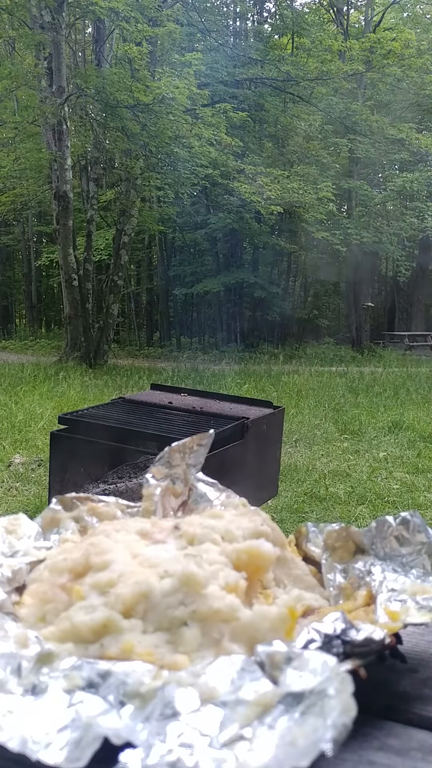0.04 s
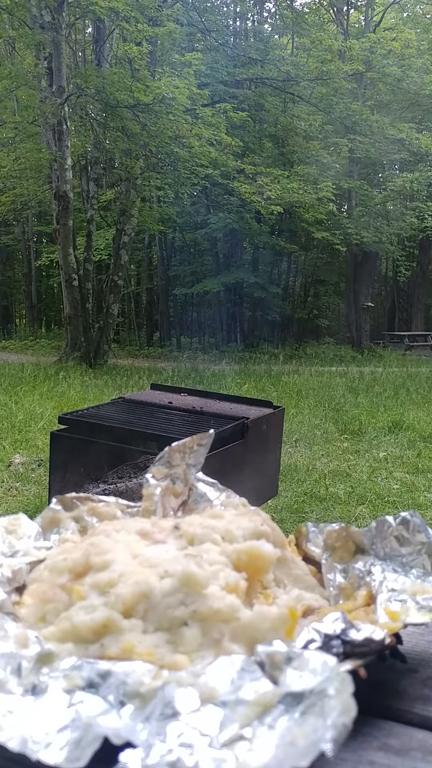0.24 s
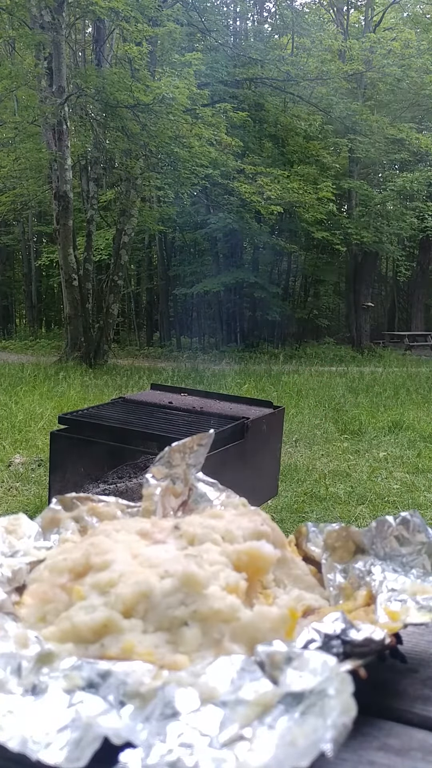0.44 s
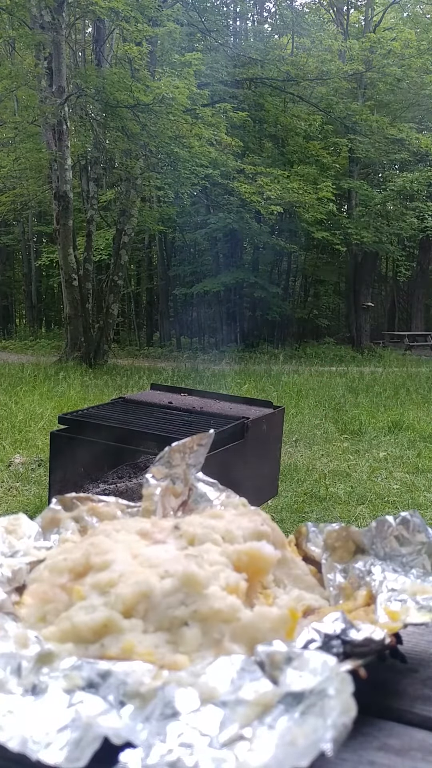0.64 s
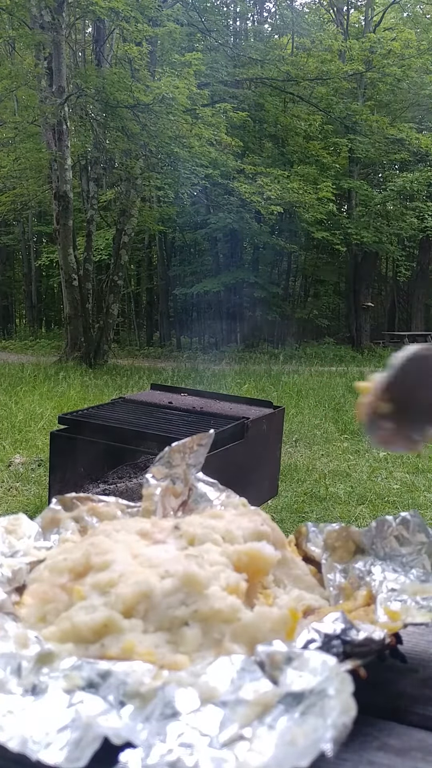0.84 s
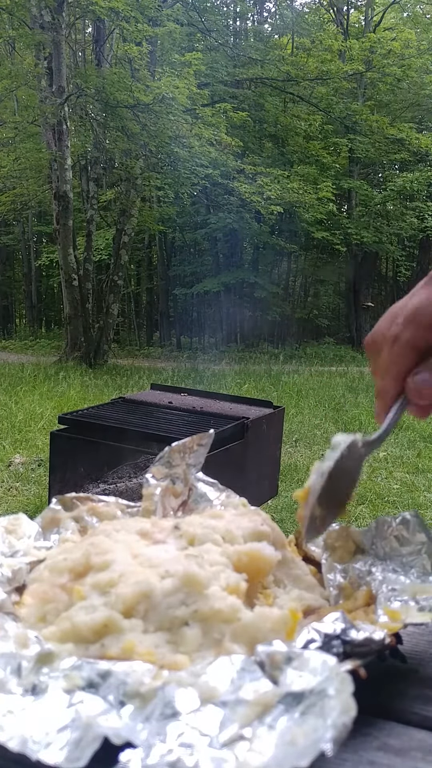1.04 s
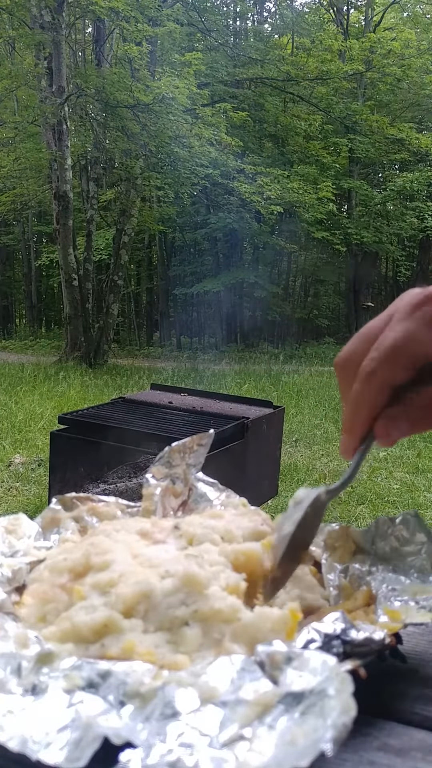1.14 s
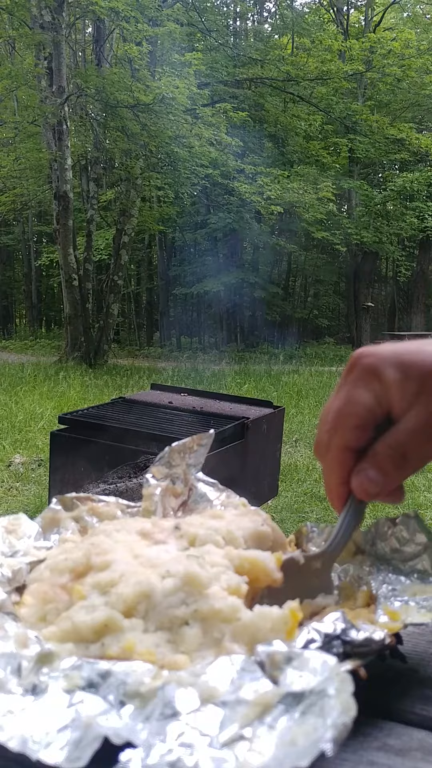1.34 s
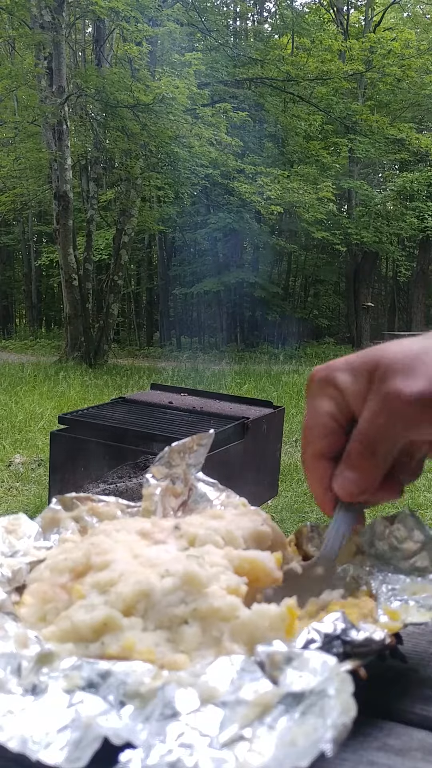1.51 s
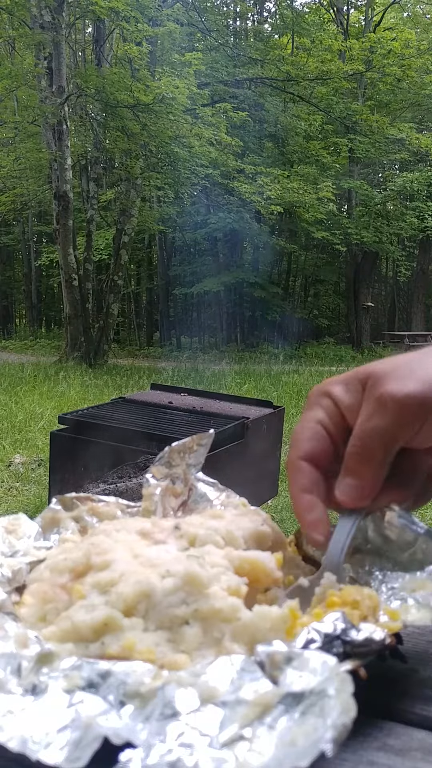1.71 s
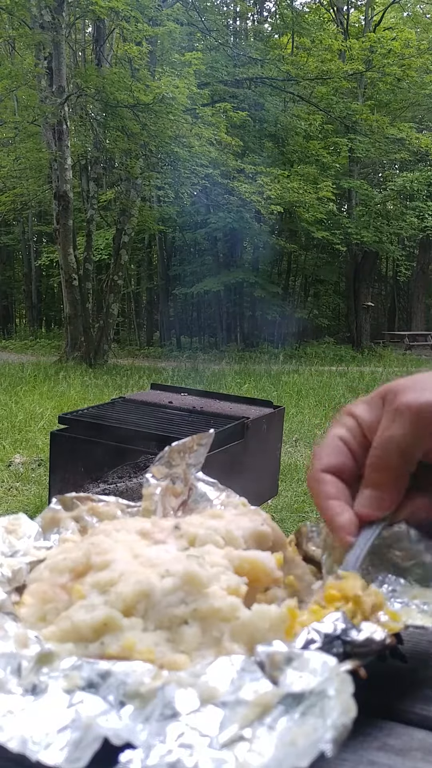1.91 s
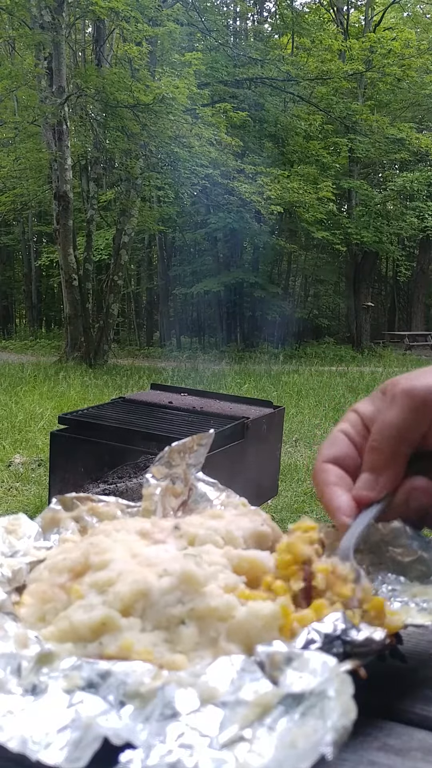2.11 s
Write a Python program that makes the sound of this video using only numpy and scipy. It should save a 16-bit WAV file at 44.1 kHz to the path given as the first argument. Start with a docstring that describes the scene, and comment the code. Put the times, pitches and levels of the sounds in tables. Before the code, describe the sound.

Something hard is set down on a wooden table in a quiet forest clearing, briefly buzzing the microphone resting there. A second, hollow knock follows, then quiet scrapes and crinkles as a spoon digs into a foil packet.

```python
"""Picnic table in a forest clearing

Something hard is put down on a wooden table: the boards ring, the case of the microphone resting on
them buzzes, and the trees answer. A soft bump follows, then a short slide ending in a hollow knock.
A metal spoon digs into food in a foil packet, catching and slipping in short scrapes as creases snap.
Behind it all lie very quiet open air and, at the start, one faint bird-like note."""
import sys
import numpy as np
from scipy import signal
from scipy.fft import rfft, irfft, next_fast_len
from scipy.io import wavfile
from scipy.ndimage import map_coordinates

SR = 44100
rng = np.random.default_rng(int(sys.argv[2]) if len(sys.argv) > 2 else 0)


def materialize(psi):
    """Save the field psi as 16-bit PCM at rate SR to the path in sys.argv[1].

    A 1-D psi becomes a single channel; in a 2-D psi each row is a channel.
    """
    bounded = np.clip(np.atleast_2d(psi).T, -1, 1)
    quanta = np.round(bounded * 32767).astype(np.int16)
    wavfile.write(sys.argv[1], SR, quanta)


N = 94815
T = np.arange(N) / SR
KNOCK_S = 0.243
WOOD_WIDTH, PACKET_WIDTH, AIR_WIDTH = 0.1, 0.688, 0.74  # stereo spread of the noise

# Tone curves give shape only; a positive pan_db leans left.
# hollow ring of the table under bumps and slides: pitch_hz, level_db, t60_s, pan_db
HOLLOW_MODES = [(416, -28.5, 0.061, -9), (616, -33.5, 0.072, -10.5), (780, -32.5, 0.081, -15),
                (933, -30, 0.054, -14), (1044, -39.5, 0.054, -19.5), (1533, -33.5, 0.05, 2),
                (1603, -33.5, 0.068, -5), (2150, -55, .04, -3), (2790, -57.5, 0.066, 19),
                (3200, -54.5, .06, 2)]
# dull tone of the wood under that ring: freq_hz, level_db
THUMP_TONE = [(30, -27), (90, -15.5), (170, 2.5), (300, -7.5), (900, -8.5), (1300, -17.5), (2200, -22.5),
              (3400, -31), (5500, -35.5), (9000, -52), (16000, -64)]


def knock():
    """A hard blow rings the boards, with a crack of dense, short resonances and a low thud."""
    # modes of the boards: pitch_hz, level_db, t60_s, pan_db
    board_modes = [(319.3, -24, 0.13, 6.5), (382, -18.5, 0.026, 7), (498, -17.5, 0.063, 5.5),
                   (590, -32, 0.22, -4), (692.2, -17.5, 0.123, 0), (803, -17, 0.1, -3.5),
                   (918, -10.5, 0.09, -7.5), (995, -26.5, 0.092, -13), (1123, -16.5, 0.061, -13.5),
                   (1226.3, -21.5, 0.073, -3), (1309, -17, 0.074, -1), (1544.6, -2, 0.038, 3),
                   (1622, -13.5, 0.049, -1.5), (1759, -16.5, 0.028, -4), (2044, -17.5, 0.038, 10.5),
                   (2217, -19, 0.038, 21), (2786, -29.5, 0.053, 11.5), (3100, -25, 0.081, 18),
                   (3280, -26.5, 0.031, -0.5), (3640, -24.5, 0.016, 11.5)]
    # tone of the crack and of the thud: freq_hz, level_db
    crack_tone = [(30, -9), (120, -2.5), (450, -6), (1000, -5.5), (1550, 3.5), (2250, -7), (2520, -19),
                  (2950, -11.5), (3700, -13), (4100, -21), (4500, -16), (6600, -28.5), (7400, -49),
                  (16000, -66.5)]
    thud_tone = [(25, -8), (70, -9.5), (160, -1.5), (320, -3), (600, -17.5), (3000, -60.5)]
    # stereo placement of the crack: freq_hz, pan_db
    crack_pan = [(60, 7), (300, 8), (800, -5), (1500, -3), (2400, 10), (3300, 8.5), (4500, 18.5),
                 (9000, 22)]
    push = undb(4.5) * impulse(KNOCK_S)
    burst = undb(-22) * noise(width=0.46) * fade(KNOCK_S, t60_s=0.051)
    crack = colour(push + burst, crack_tone, crack_pan)
    thud = colour(noise(AIR_WIDTH) * fade(KNOCK_S, t60_s=0.47), thud_tone)
    return undb(-0.5) * ring(KNOCK_S, board_modes) + crack + undb(-40) * thud


def case_rattle():
    """The microphone's case buzzes on the jolted boards: thin, bright ticks on the left."""
    # jolts of the case: start_s, buzz_db, tick_db
    jolts = [(0.1624, -52.5, -83), (.179, -55.5, -81), (0.2424, -11, -76), (.2868, -26.5, -34),
             (0.614, -56, -61), (0.9029, -54, -75), (1.299, -56, -80), (1.312, -46, -80)]
    # tone of the buzz and of the tick: freq_hz, level_db
    buzz_tone = [(3000, -45), (7400, -37), (7950, -5.5), (8550, -2), (9000, -16), (9500, -8),
                 (10400, -39.5), (12000, -54), (12700, -34.5), (14500, -49), (16000, -57.5)]
    tick_tone = [(2000, -26), (5000, -10.5), (6500, -3), (9000, 3), (11000, -8.5), (16000, -11)]
    t60_s, tail_t60_s, tail_db, right_db = 0.012, 0.14, -28.5, -23.5
    shake = sum(undb(db) * (fade(s, t60_s) + undb(tail_db) * fade(s, tail_t60_s)) for s, db, _ in jolts)
    taps = sum(undb(db) * fade(s, t60_s) for s, _, db in jolts)
    buzz = colour(noise(WOOD_WIDTH) * shake, buzz_tone)
    ticks = colour(noise(WOOD_WIDTH) * taps, tick_tone)
    return (buzz + ticks) * undb([[0], [right_db]])


def bumps():
    """Softer blows to the right: a click and a hollow ring over a dull thump."""
    # blows on the table: start_s, ring_db, thump_db
    blows = [(0.6155, -27.5, -49), (0.9022, -1.5, -39), (1.243, -36.5, -64.5), (1.3237, -29, -50.5),
             (1.382, -41, -61.5)]
    hollow = sum(undb(db) * ring(s, HOLLOW_MODES) for s, db, _ in blows)
    clicks = undb(14) * sum(undb(db) * impulse(s) for s, _, db in blows)
    decay = sum(undb(db) * fade(s, t60_s=0.14) for s, _, db in blows)
    thump = colour(clicks + noise(WOOD_WIDTH) * decay, THUMP_TONE)
    return hollow + sides(pan_db=-6.5) * thump


def slide():
    """Friction on the boards excites their hollow ring and a dull rub."""
    # pushes across the wood: peak_s, rise_s, fall_s, level_db
    pushes = [(0.759, 0.043, 0.025, -67.5), (0.861, 0.014, 0.016, -52), (0.895, 0.016, .008, -49)]
    rub = noise(WOOD_WIDTH) * sum(undb(db) * swell(s, rise, fall) for s, rise, fall, db in pushes)
    response = ring(0, HOLLOW_MODES)
    response /= np.sqrt(np.sum(response ** 2) / 2)  # unit energy, averaged over both sides
    hollow = signal.fftconvolve(rub, response, axes=1)[:, :N]
    return hollow + undb(-1.5) * colour(rub, THUMP_TONE)


def spoon():
    """The spoon catches and slips on foil: showers of tiny clicks, with creases snapping."""
    # spoon strokes: peak_s, rise_s, fall_s, body_db, scrape_db, crinkle_db
    strokes = [(1.319, 0.015, 0.017, -79.5, -61, -59), (1.475, 0.01, 0.0077, -61, -48, -65),
               (1.513, 0.055, 0.035, -55, -62, -73), (1.682, 0.014, 0.013, -46, -48.5, -45.5),
               (1.798, 0.0088, 0.034, -52.5, -53, -48.5), (1.875, 0.0085, 0.012, -63.5, -81, -56.5),
               (1.933, .016, 0.019, -84, -70.5, -59)]
    # single creases giving way: start_s, body_db, scrape_db, crinkle_db
    snaps = [(1.3235, -47, -49, -60), (1.4432, -57, -49, -65), (1.456, -52, -49, -51),
             (1.4693, -46, -42.5, -53.5), (1.478, -51, -45, -59), (1.494, -45, -47.5, -54.5),
             (1.555, -65, -60, -57), (1.566, -67, -59, -61), (1.649, -49, -65, -66),
             (1.6828, -38.5, -49, -40), (1.685, -43, -49, -33), (1.786, -65, -65, -52),
             (1.798, -52, -48, -38), (1.816, -51, -50, -51), (1.835, -51, -56, -64), (1.935, -76, -70, -54),
             (2.135, -72, -63, -68)]
    # the packet's three voices, low to high: freq_hz, level_db
    body = [(60, -14.5), (300, -11.5), (480, -13), (700, -4), (860, -3), (1050, -14), (1350, -9),
            (1700, -12), (3000, -36), (16000, -62)]
    scrape = [(200, -32), (1100, 0.5), (1800, 0), (2250, -1.5), (2900, -1.5), (3600, 1.5), (5000, -12.5),
              (8000, -19.5), (16000, -64)]
    crinkle = [(500, -14.5), (3000, -14.5), (3900, -3), (4700, 7.5), (6000, 1.5), (7100, -8.5), (8000, 0.5),
               (8750, -0.5), (9400, -9.5), (10500, -20), (12000, -18.5), (15000, -21), (16000, -44)]
    # stereo placement of the packet: freq_hz, pan_db
    packet_pan = [(100, 6.5), (750, -5.5), (1300, -1), (2500, 4), (5500, 2), (8500, 16.5), (14000, 14)]
    grains_per_s = 2600
    grains = (rng.random(N) < grains_per_s / SR) * rng.choice([-1, 1], N)
    accent_db = np.minimum(rng.exponential(size=N), 3.5)
    grains = grains * undb(accent_db) * stick_slip(depth_db=3.5)
    grains = grains / grains.std() * (1 + PACKET_WIDTH * rng.standard_normal((2, N)))
    packet = 0
    for k, voice in enumerate((body, scrape, crinkle)):
        pressure = sum(undb(db[k]) * swell(s, rise, fall) for s, rise, fall, *db in strokes)
        # a crease breaks with a click, then rustles briefly
        clicks = undb(15.5) * sum(undb(db[k]) * impulse(s) for s, *db in snaps)
        settling = sum(undb(db[k]) * fade(s, t60_s=0.021) for s, *db in snaps)
        rustle = undb(-2) * noise(PACKET_WIDTH) * settling
        packet += colour(grains * pressure + clicks + rustle, voice, packet_pan)
    return packet


def foil_rasp():
    """Friction through one broad foil resonance that sinks in pitch as the spoon digs in."""
    # path of the resonance: time_s, centre_hz, level_db
    glide = [(1.441, 3200, -76), (1.468, 2600, -48), (1.478, 2093, -46), (1.486, 1793, -64),
             (1.495, 1529, -46.5), (1.51, 1286, -61.5), (1.561, 990, -75)]
    time_s, centre_hz, level_db = np.array(glide).T
    bandwidth_hz = 1300
    band = lowpass(noise(PACKET_WIDTH) + 1j * noise(PACKET_WIDTH), bandwidth_hz / 2)
    phase = 2 * np.pi * np.cumsum(np.interp(T, time_s, centre_hz)) / SR
    rasp = stick_slip(depth_db=3) * np.real(band * np.exp(1j * phase))  # band shifted up to the centre
    envelope = undb(np.interp(T, time_s, level_db, left=-120, right=-120))
    return sides(pan_db=4.5) * rasp / rasp.std() * envelope


def stick_slip(depth_db, catches_per_s=270):
    """The uneven grip of the spoon, as a jittering gain."""
    return undb(depth_db * np.interp(T * catches_per_s, np.arange(N), rng.uniform(-2, 2, N)))


def table_rumble():
    """The table rumbles softly as weight shifts on it."""
    # shifts of weight: peak_s, rise_s, fall_s, level_db
    shifts = [(0.351, 0.014, 0.018, -49.5), (0.629, 0.0045, 0.0083, -45), (.755, 0.046, 0.031, -58.5),
              (.91, 0.023, 0.03, -50.5), (1.251, 0.016, 0.017, -61), (1.34, 0.011, 0.063, -52),
              (1.51, 0.064, 0.071, -61.5)]
    # tone of the rumble: freq_hz, level_db
    rumble_tone = [(25, -9.5), (60, -4.5), (120, 0.5), (170, -1), (230, -12.5), (400, -15.5), (900, -41),
                   (3000, -68.5)]
    load = sum(undb(db) * swell(s, rise, fall) for s, rise, fall, db in shifts)
    return sides(pan_db=-7) * colour(noise(AIR_WIDTH) * load, rumble_tone)


def forest_echo():
    """Trunks and leaves scatter the hard knock, treble dying first; the forest edge answers late."""
    # tone of the echo from the trees and from the forest edge: freq_hz, level_db
    trees_tone = [(100, -13), (450, -16), (700, -4), (1000, -3), (1250, -2.5), (1550, -0.5), (2200, -6.5),
                  (2550, -20.5), (3000, -11), (4000, -26), (7000, -41.5), (16000, -59)]
    edge_tone = [(300, -30), (700, -14), (950, -7), (1050, -11), (1300, -2.5), (1580, 1), (1750, -7.5),
                 (2100, -8), (2500, -21.5), (3100, -21), (5000, -45)]
    build_s, edge_delay_s = 0.025, 0.18
    scatter = colour(noise(width=1), trees_tone)
    lows = lowpass(scatter, cutoff_hz=1800)
    tail = lows * fade(KNOCK_S, t60_s=0.42, attack_s=build_s)
    tail += (scatter - lows) * fade(KNOCK_S, t60_s=0.34, attack_s=build_s)
    late_swell = swell(KNOCK_S + edge_delay_s, rise_s=0.07, fall_s=0.052) * (T > KNOCK_S)
    edge = colour(noise(width=1), edge_tone) * late_swell
    return sides(pan_db=-5) * (undb(-30.5) * tail + undb(-53) * edge)


def far_whistle():
    """A very faint wavering note, like a bird deep in the woods."""
    pitch_hz, end_s, release_s = 1850, 0.19, 0.03
    waver = 0.008 * np.interp(T * 30, np.arange(N), rng.standard_normal(N))
    note = np.sqrt(2) * np.sin(2 * np.pi * np.cumsum(pitch_hz * (1 + waver)) / SR)
    return undb(-83.5) * note * np.clip((end_s - T) / release_s, 0, 1)


def open_air():
    """A quiet bed of outdoor rumble and hiss."""
    # tone of the clearing: freq_hz, level_db
    air_tone = [(25, -11), (50, -0.5), (130, -4.5), (200, -12), (400, -14), (600, -18.5), (1200, -21.5),
                (2400, -26), (5000, -28), (9000, -27), (11000, -31.5), (15500, -35)]
    return undb(-66.5) * colour(noise(AIR_WIDTH), air_tone)


def ring(start_s, modes, contact_s=0.0004):
    """Decaying modes of struck wood, neighbours swinging in opposite directions."""
    return sum((-1) ** k * undb(db) * sides(pan_db) * fade(start_s, t60_s, contact_s)
               * np.sin(2 * np.pi * hz * (T - start_s))
               for k, (hz, db, t60_s, pan_db) in enumerate(modes))


def impulse(start_s):
    """One sharp push."""
    return 1. * (np.arange(N) == int(start_s * SR))


def fade(start_s, t60_s, attack_s=0.0002):
    """Quick rise and exponential decay."""
    age = np.maximum(T - start_s, 0)
    return (1 - np.exp(-age / attack_s)) * np.exp(-np.log(1000) * age / t60_s)


def swell(peak_s, rise_s, fall_s):
    """An envelope that builds to a peak and lets go."""
    return np.exp(-np.maximum((peak_s - T) / rise_s, (T - peak_s) / fall_s))


def noise(width):
    """Stereo white noise; width 0 is the same in both ears, 1 unrelated."""
    mid, side = rng.standard_normal((2, N))
    return (mid + width * side * np.array([[1], [-1]])) / np.hypot(1, width)


def colour(x, tone, pan=((100, 0), (1000, 0))):
    """Unit-power EQ along a tone curve, panned by frequency."""
    size = next_fast_len(2 * N)
    size += size % 2
    log_hz = np.log(np.maximum(np.fft.rfftfreq(size, 1 / SR), 1))
    curve = lambda points: np.interp(log_hz, np.log([hz for hz, _ in points]), [db for _, db in points])
    gain = undb(curve(tone) + np.array([[1], [-1]]) * curve(pan) / 2)
    gain /= np.sqrt(np.mean(gain ** 2))
    # minimum phase, so nothing rings ahead of a hit
    cepstrum = irfft(np.log(gain))
    cepstrum[:, 1:size // 2] *= 2
    cepstrum[:, size // 2 + 1:] = 0
    return irfft(rfft(x, size) * np.exp(rfft(cepstrum)))[:, :N]


def lowpass(x, cutoff_hz):
    """Gentle two-pole treble roll-off."""
    return signal.sosfilt(signal.butter(2, cutoff_hz, fs=SR, output="sos"), x)


def sides(pan_db):
    """Left and right gains for a level difference."""
    return undb(np.array([[pan_db], [-pan_db]]) / 2)


def undb(db):
    """Decibels to gain."""
    return 10 ** (np.asarray(db) / 20)


def scene():
    """The table and its echo, the spoon in the packet, and the clearing behind."""
    table = knock() + forest_echo() + case_rattle() + bumps() + slide() + table_rumble()
    return table + spoon() + foil_rasp() + open_air() + far_whistle()


def record(dry):
    """A stereo pair, the right side slightly late; peaks clip at full scale and the top is cut."""
    lag_s, top_hz = 0.00005, 16000
    right = map_coordinates(dry[1], [(T - lag_s) * SR], order=5, mode="nearest")
    clipped = np.clip([dry[0], right], -1, 1)
    return signal.sosfilt(signal.ellip(8, 0.2, 70, top_hz, fs=SR, output="sos"), clipped)


dry = scene()
out = record(dry)
materialize(out)
```